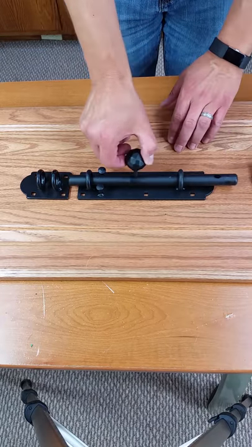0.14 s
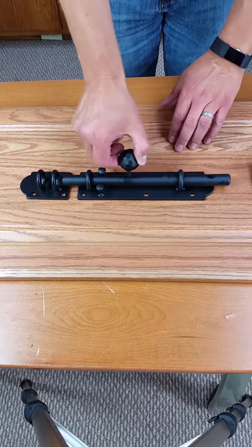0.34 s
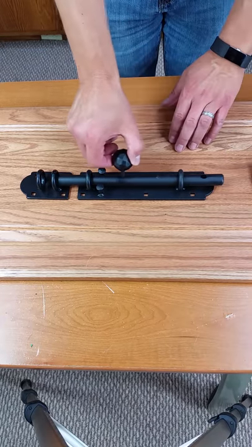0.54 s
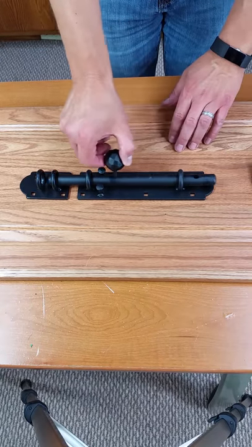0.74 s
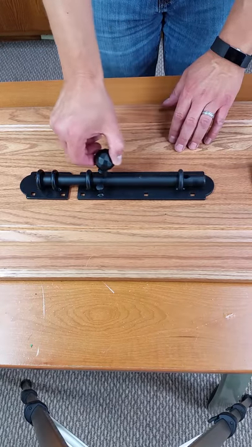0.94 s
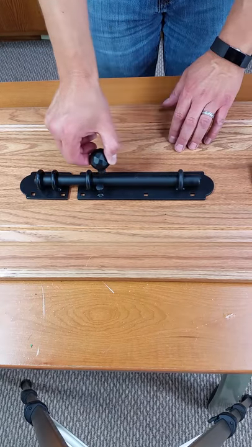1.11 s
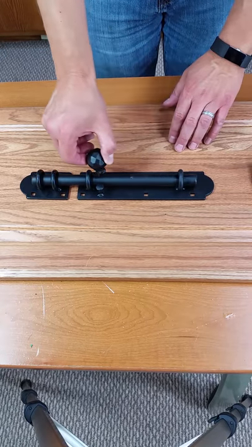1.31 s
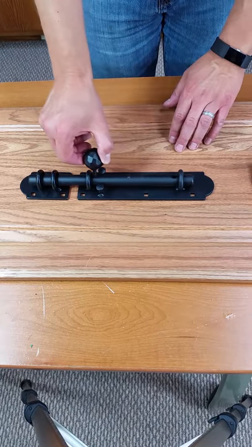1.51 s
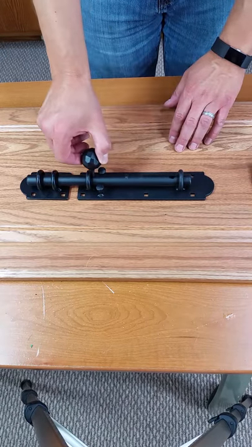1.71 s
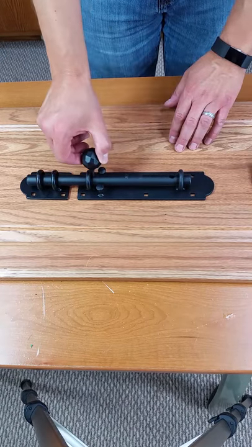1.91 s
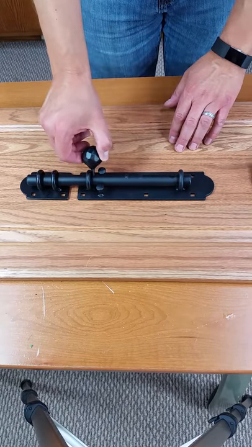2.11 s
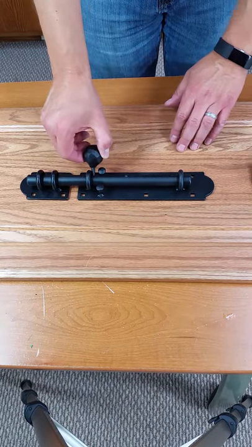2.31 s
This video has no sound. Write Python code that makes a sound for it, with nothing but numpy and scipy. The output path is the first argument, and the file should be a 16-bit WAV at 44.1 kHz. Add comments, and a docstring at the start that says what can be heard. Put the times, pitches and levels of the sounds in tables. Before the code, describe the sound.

An iron slide bolt on a wooden table starts almost silently, scrapes with woody, juddering catches from about 0.2 to 0.6 s, dips, then scrapes harder from 0.7 s into a sharp clunk with a bright tick at 1.03 s. The rubbing fades by 1.3 s, with a faint scuff near 1.4 s. A softer, duller knock rattles briefly at 1.8 s. Small room, low rumble, and faint hiss swelling with the movement.

```python
"""An iron slide bolt is pushed in two strokes through its rings on a wooden table top in a small room,
hits its stop with a clunk and a tick; its knob later drops with a softer knock. Slips and blows ring decaying modes
of wood, plate and iron, a little stronger and earlier at the left microphone; decaying noise is the room.
Behind it, filtered noise: room rumble, a narrow hiss mainly at the left microphone, a faint treble hiss,
all swelling while the bolt moves, and a steady hiss fainter still."""
import sys
import numpy as np
from scipy import signal
from scipy.fft import rfft, irfft, next_fast_len
from scipy.io import wavfile
from scipy.ndimage import map_coordinates

SR = 44100
rng = np.random.default_rng(int(sys.argv[2]) if len(sys.argv) > 2 else 0)


def inscribe(sig):
    """Save sig as 16-bit PCM at rate SR to the path in sys.argv[1].

    A 1-D sig is mono; a 2-D sig holds one channel per row.
    Samples are clipped to [-1, 1] before scaling.
    """
    pcm = np.round(np.clip(np.atleast_2d(sig).T, -1, 1) * 32767)
    wavfile.write(sys.argv[1], SR, pcm.astype(np.int16))


def natural_amplitude(level_db):
    """Convert a level in decibels to a linear amplitude factor, elementwise."""
    exponent = np.asarray(level_db, float) / 20
    return 10 ** exponent


N = 103635  # length in samples


def along(points, hz):
    """Reads (Hz, value) points on a log frequency axis."""
    point_hz, value = np.transpose(points)
    return np.interp(np.log(hz + 1), np.log(point_hz + 1), value)


def curves(rows):
    """Gives one value per sample for each column after the time."""
    seconds, *columns = np.transpose(rows)
    return np.array([np.interp(np.arange(N) / SR, seconds, column) for column in columns])


def unit(x):
    """Scales x to rms 1."""
    return x / np.sqrt(np.mean(x ** 2) + 1e-20)


def wobble(rate):
    """Draws a smooth random curve with rate knots a second."""
    return map_coordinates(rng.standard_normal(1000), [np.arange(N) * rate / SR])


def filtered(x, response):
    """Multiplies the spectrum of x by a response of frequency."""
    n = x.shape[-1]
    padded = next_fast_len(n + 8192)
    hz = np.fft.rfftfreq(padded, 1 / SR)
    return irfft(rfft(x, padded) * response(hz), padded)[..., :n]


def noise(spectrum):
    """Two unrelated channels of noise shaped by (Hz, dB) points."""
    return filtered(rng.standard_normal((2, N)), lambda hz: natural_amplitude(along(spectrum, hz)))


def pair(x, alike):
    """Mixes two unrelated signals into a left-right pair of given likeness."""
    def mid_side(hz):
        angle = np.arccos(np.clip(along(alike, hz), -1, 1)) / 2
        return np.array([np.cos(angle), np.sin(angle)])

    mid, side = filtered(x, mid_side)
    return np.array([mid + side, mid - side])


def tilt(x, left_db):
    """Puts half of the left-over-right level difference on each microphone."""
    return filtered(x, lambda hz: natural_amplitude(along(left_db, hz) * [[.5], [-.5]]))


# Modes of the table top with the bolt on it, in three groups.
# Each row: frequency in Hz, level in dB, t60 in seconds.
LOW_MODES = [(148, -10.5, 0.059), (178.5, 3, 0.085), (230.3, 0, 0.087), (261.5, -7.5, 0.12),
             (312, -2, 0.057), (359.2, -5, 0.086)]
MIDDLE_MODES = [(467.3, 0, 0.057), (485.2, -3, 0.06), (507, 1.5, 0.081), (551, -3.5, .06),
                (595.3, -3.5, 0.04), (647.4, -10.5, 0.068), (715, -13.5, 0.06)]
HIGH_MODES = [(835, -6, .04), (890, -1, .045), (965, -7, .03), (1077, -1, .055), (1170, -6, .03),
              (1249, -3, .04), (1303, -6, .035), (1370, -4, .035), (1470, -2, .035), (1560, -5, .025)]
# Modes of the mounting plate, rung by blows only. Each row: frequency in Hz, level in dB, t60 in seconds.
PLATE_MODES = [(179, 0, .15), (361, 0, .18), (530, -1, .2), (1071, -9, .15), (1250, -10, .14)]
# Modes of the iron bolt itself. Each row: frequency in Hz, level in dB, t60 in seconds.
IRON_MODES = [(1690, 2, .04), (1857, 0, .05), (2100, -3, .03), (2350, -3, .03), (2650, -2, .03),
              (2950, -3, .03), (3200, -1, .04), (3550, -3, .03)]
# The band each group radiates: low, middle, high, plate, iron. Each row: from in Hz, to in Hz.
RADIATED_BANDS = [(110, 420), (410, 1320), (750, 1450), (120, 1500), (1600, 4500)]


def rings():
    """Impulse responses of the five groups: sums of decaying sines, kept to the band each group radiates."""
    t = np.arange(SR // 4) / SR
    build_up = 1 - np.exp(-t / .001)  # time constant in seconds
    groups = (LOW_MODES, MIDDLE_MODES, HIGH_MODES, PLATE_MODES, IRON_MODES)
    turns = (-1, 1, -1, 1, -1)  # -1: neighbouring modes start in opposite directions
    responses = []
    for modes, turn, band in zip(groups, turns, RADIATED_BANDS):
        ring = np.zeros(len(t))
        for k, (hz, db, t60) in enumerate(modes):
            decay = natural_amplitude(db - 60 * t / max(t60, .005))
            ring += turn ** k * decay * np.sin(2 * np.pi * hz * t)
        radiated = signal.butter(5, band, "band", fs=SR, output="sos")
        responses.append(signal.sosfilt(radiated, build_up * ring))
    return np.array(responses)


# The bolt sliding through its rings. Each row: time in seconds, level of the middle modes in dB,
# low modes over them in dB, high modes over them in dB.
SLIDE_LEVELS = [(0, -76.5, 5, -21), (.15, -64.5, 3, -22.5), (.24, -51.5, -4, -26), (.28, -50.5, 2, -30),
                (.32, -46.5, -1, -20), (.45, -50, 0.5, -15), (.57, -55.5, 3, -19.5), (.61, -62, -10, -11.5),
                (.7, -49.5, -5, -27), (.715, -46, -5, -19), (.86, -46, -2.5, -13.5), (.95, -45, -6.5, -12),
                (1.01, -42.5, -20, -16), (1.1, -46.5, -12, -26), (1.25, -66.5, 1.5, -7),
                (1.36, -78.5, 1, -4), (1.41, -64.5, 1.5, -12.5), (1.56, -69, 0, -27),
                (1.68, -82.5, 12, -14), (1.76, -87.5, 3, -18)]
SLIPS_PER_S, SLIP_SPREAD_DB = 1500, 3  # for each group of modes
JUDDER_DB, JUDDER_PER_S = 1.8, 45  # depth, and knots a second


def slide(ring):
    """Tiny slips of uneven size and either direction, juddering in clumps, shake the table modes."""
    chance, sign = rng.random((2, 3, N))
    size = natural_amplitude(SLIP_SPREAD_DB * rng.standard_normal((3, N)))
    slips = (chance < SLIPS_PER_S / SR) * size * np.sign(sign - .5)
    slips = unit(slips * natural_amplitude(JUDDER_DB * wobble(JUDDER_PER_S)))
    level_db, low_db, high_db = curves(SLIDE_LEVELS)
    force = slips * natural_amplitude([level_db + low_db, level_db, level_db + high_db])
    wood = ring[:-2]  # without plate and iron
    wood = wood / np.linalg.norm(wood, axis=1, keepdims=True)
    return signal.fftconvolve(force, wood, axes=1)[:, :N].sum(0)


# Swell of the background. Each row: time in seconds, treble hiss level in dB before TREBLE_DB is added.
SWELL_LEVELS = [(0.01, -89), (0.2, -92), (0.48, -82.5), (0.67, -85.5), (1.05, -82), (1.23, -82),
                (1.33, -88.5), (1.74, -93.5), (1.87, -89), (2.35, -93.5)]
# Spectrum of the room rumble. Each row: frequency in Hz, level in dB.
RUMBLE_SPECTRUM = [(11, -39.5), (18, -15.5), (30, -26.5), (58, -14.5), (72, -24), (88, -12), (100, -9.5),
                   (112, -11), (120, -10.5), (140, -19), (296, -31), (386, -31.5), (470, -29.5), (723, -41),
                   (1000, -46.5), (1300, -44.5), (2300, -63), (3000, -88.5), (5000, -120)]
# Likeness of the rumble at the two microphones. Each row: frequency in Hz, likeness from 0 to 1.
RUMBLE_LIKENESS = [(30, 1), (70, 0.71), (130, 0.91), (290, 0.62), (640, 0.13), (1400, 0.072)]
# Balance of the rumble. Each row: frequency in Hz, left over right in dB.
RUMBLE_BALANCE = [(60, -1), (200, 1), (700, 2), (1500, 3.5), (2300, 0.5)]
# Spectrum of the narrow hiss. Each row: frequency in Hz, level in dB.
NARROW_SPECTRUM = [(1120, -61.5), (1900, -31.5), (2170, -29.5), (2430, -25), (2640, -22), (3150, -14.5),
                   (3510, -22.5), (4100, 1.5), (4350, 3), (5470, -14), (6280, -35), (7500, -55.5),
                   (9750, -63), (16500, -120)]
# The narrow hiss at the right microphone. Each row: frequency in Hz, right relative to left in dB.
NARROW_AT_RIGHT = [(2000, 0), (3000, -9.5), (4400, -38.5), (5500, -19.5), (7000, -10.5)]
# Spectrum of the treble hiss. Each row: frequency in Hz, level in dB.
TREBLE_SPECTRUM = [(5500, -120), (6500, -24), (9500, -20), (12000, -11.5), (14000, -6.5), (15850, -3.5),
                   (15950, -120)]
RUMBLE_DB, RUMBLE_FOLLOWS = -58.5, 0.75  # level at the end, and share of the swell followed
NARROW_DB, NARROW_FOLLOWS = -64, 0.75  # likewise, before the right side is lowered
TREBLE_DB, AIR_DB = 0.5, -99  # treble hiss over the swell curve; steady faint hiss


def background():
    """Shaped noises: rumble, narrow hiss and treble hiss follow the swell by their shares; air holds steady."""
    swell_db, = curves(SWELL_LEVELS)
    rise_db = swell_db - SWELL_LEVELS[-1][1]
    rumble = unit(tilt(pair(noise(RUMBLE_SPECTRUM), RUMBLE_LIKENESS), RUMBLE_BALANCE))
    rumble = rumble * natural_amplitude(RUMBLE_DB + RUMBLE_FOLLOWS * rise_db)
    narrow = unit(noise(NARROW_SPECTRUM))
    narrow = filtered(narrow, lambda hz: natural_amplitude(along(NARROW_AT_RIGHT, hz) * [[0], [1]]))
    narrow = narrow * natural_amplitude(NARROW_DB + NARROW_FOLLOWS * rise_db)
    treble = unit(noise(TREBLE_SPECTRUM)) * natural_amplitude(swell_db + TREBLE_DB)
    air = unit(noise([(5000, -120), (6000, -2.5), (15850, -10.0), (15950, -120)])) * natural_amplitude(AIR_DB)
    return rumble + narrow + treble + air


# Decay of the small room. Each row: frequency in Hz, t60 in seconds.
ROOM_DECAY = [(150, 0.69), (500, 0.3), (1200, 0.38), (3000, 0.033)]
# Likeness of the room at the two microphones. Each row: frequency in Hz, likeness from 0 to 1.
ROOM_LIKENESS = [(100, 0.99), (300, 0.66), (700, 0), (1500, 0.084)]


def room(x):
    """A noise tail that dies by frequency, drawn anew for each overlapping stretch of sound."""
    step = SR // 5
    out = np.zeros((2, N + 2 * SR))
    x = np.pad(x, (step, 2 * step))
    fade = signal.get_window("hann", 2 * step)
    for start in range(0, N + step, step):
        hz, t, spectrum = signal.stft(rng.standard_normal((2, SR // 2)), SR, nperseg=256)
        t60 = along(ROOM_DECAY, hz)[:, None]
        # the root evens out the energy of long and short decays
        dying = spectrum * natural_amplitude(-60 * t / t60) / np.sqrt(t60)
        tail = signal.istft(dying, SR, nperseg=256)[1]
        tail = pair(tail, ROOM_LIKENESS) / np.linalg.norm(tail[0])
        stretch = x[start:start + 2 * step] * fade
        wet = signal.fftconvolve(stretch[None], tail, axes=1)
        late = start + 250  # samples of delay behind the direct sound
        out[:, late:late + wet.shape[1]] += wet
    return out[:, step:step + N]


# Single contacts: the bar catching in its rings and the knob bouncing. Each row: time in seconds,
# force in dB, low modes over the middle in dB, high modes over the middle in dB.
CATCH_CONTACTS = [(.229, -49, 3, -22), (.309, -45, -9, -16), (.339, -57, 9, -10), (.508, -49, -4, -14),
                  (.7065, -42, -5, -28), (.72, -43, -3, -24), (.771, -46, -10, -20), (.85, -48, -3, -18),
                  (.896, -49, -8, -18), (.974, -43, -11, -15), (1.819, -52, 3, -18), (1.851, -56, -6, -14)]
# Blows: the clunk at the stop, then the knob dropping. Each row: start in seconds, force in dB; low, high,
# iron and plate modes over the middle, each in dB; rattle length in seconds.
BLOW_CONTACTS = [(1.0261, -41, 4.5, 8.5, -13, 6.5, .06), (1.796, -41, 2, -10.5, -22.5, -20, 0.031)]
RATTLES = 12  # contacts after each blow
RATTLE_DB, RATTLE_FADE_DB = -14, -0.05  # force relative to the blow, and change per contact
RATTLE_DULL_DB = -4.5  # further change for plate and iron


def knocks(ring):
    """Catches are single soft contacts on wood; a blow also rings plate and iron and rattles on for a moment."""
    force = np.zeros((len(ring), N))
    for s, db, low_db, high_db in CATCH_CONTACTS:
        force[:-2, round(s * SR)] += natural_amplitude([db + low_db, db, db + high_db])
    dull_db = RATTLE_DULL_DB * (np.arange(len(ring)) >= len(ring) - 2)
    for s, db, low_db, high_db, iron_db, plate_db, length in BLOW_CONTACTS:
        blow = natural_amplitude(db + np.array([low_db, 0, high_db, plate_db, iron_db]))
        force[:, round(s * SR)] += blow
        for k, (late, sign) in enumerate(rng.random((RATTLES, 2))):
            contact_s = s + length * (k + .5 + late) / RATTLES
            contact = np.sign(sign - .5) * natural_amplitude(RATTLE_DB + RATTLE_FADE_DB * k + dull_db) * blow
            force[:, round(contact_s * SR)] += contact
    return signal.fftconvolve(force, ring, axes=1)[:, :N].sum(0)


# Spectrum of the tick. Each row: frequency in Hz, level in dB per Hz.
TICK_SPECTRUM = [(3000, -30), (5000, 0), (7500, -6), (8800, -17), (10500, -9), (15700, -5), (15900, -120)]
TICK_DB, TICK_T60_S = -67, .007  # starting level, decay


def tick():
    """A short bright burst of decaying noise as the bolt meets its stop."""
    t = np.arange(N) / SR - BLOW_CONTACTS[0][0]
    hiss = unit(filtered(rng.standard_normal(N), lambda hz: natural_amplitude(along(TICK_SPECTRUM, hz))))
    return (t > 0) * natural_amplitude(TICK_DB - 60 * np.abs(t) / TICK_T60_S) * hiss


# Balance of bolt and room at the microphones. Each row: frequency in Hz, left over right in dB.
BOLT_BALANCE = [(100, 0.55), (200, 2.1), (500, 4), (1200, 1), (3000, 2)]
LEFT_LEAD_S, ROOM_DB = .0001, -4  # the bolt reaches the left microphone first; gain of the room tail


def scene():
    """Bolt and table reach two microphones directly and by the room; tick and background join them."""
    ring = rings()
    bolt = slide(ring) + knocks(ring)

    def lead(hz):
        return np.exp(1j * np.pi * hz * LEFT_LEAD_S * np.array([[1], [-1]]))

    direct = filtered(np.array([bolt, bolt]), lead)
    in_room = tilt(direct + natural_amplitude(ROOM_DB) * room(bolt), BOLT_BALANCE)
    return in_room + tick() + background()


def low_pass(x):
    """Removes everything above the highest recorded frequency."""
    return signal.sosfilt(signal.butter(12, 15920, fs=SR, output="sos"), x)


def record(dry):
    """Adds a small steady offset to the microphone signals and finishes the mix."""
    mix = dry - 0.0004
    return low_pass(mix)


dry = scene()
out = record(dry)
inscribe(out)
```